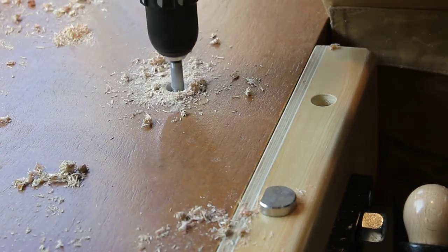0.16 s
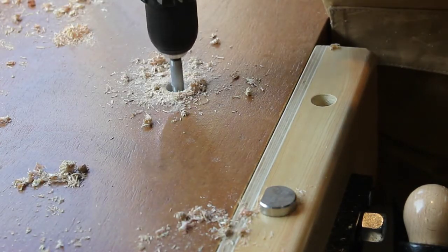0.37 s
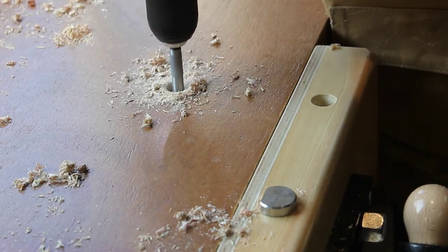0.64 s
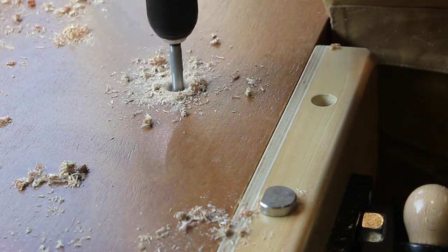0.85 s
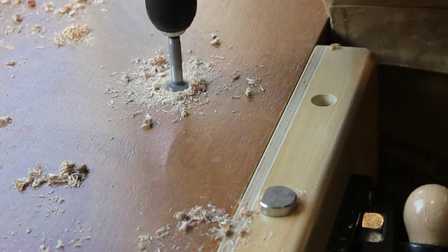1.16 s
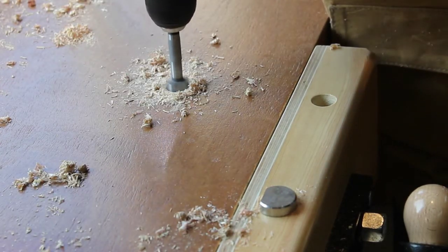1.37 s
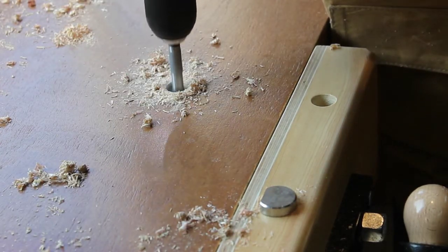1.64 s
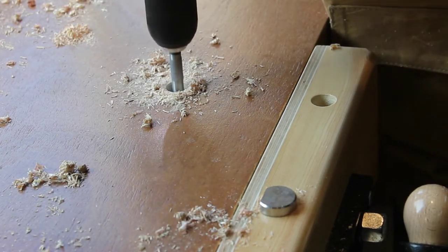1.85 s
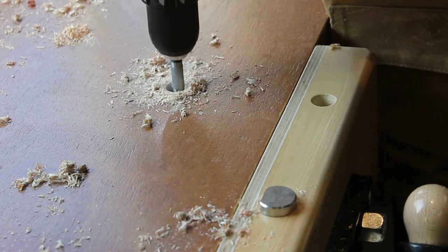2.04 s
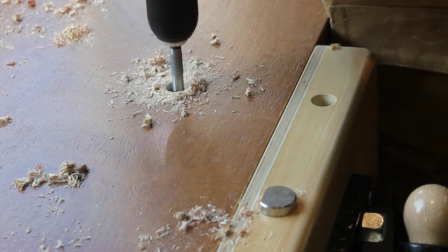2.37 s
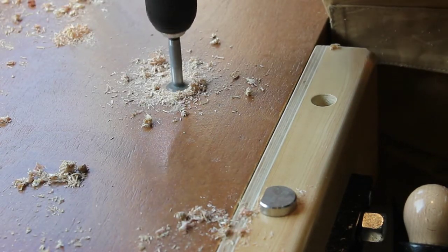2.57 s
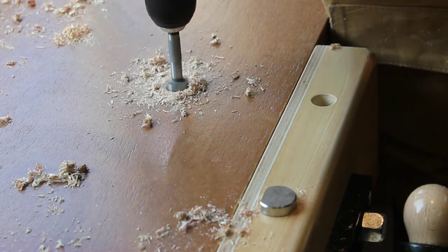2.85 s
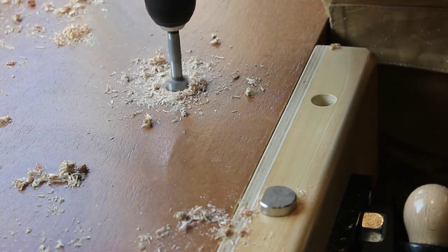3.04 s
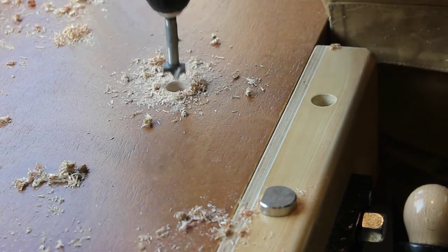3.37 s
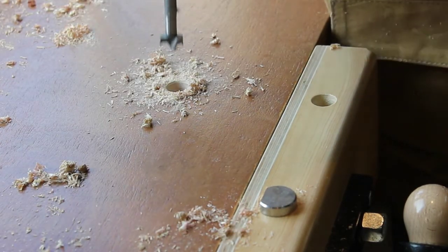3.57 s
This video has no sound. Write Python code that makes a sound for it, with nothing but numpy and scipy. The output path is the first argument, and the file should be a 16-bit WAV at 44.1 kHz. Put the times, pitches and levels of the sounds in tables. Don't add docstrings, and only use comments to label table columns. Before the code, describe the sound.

A cordless drill bores a wide hole in a wooden bench, its high gear whine wavering over gritty rattle and low thrumming bites, then runs down and clacks off; close mono microphone, small workshop.

```python
import sys
import numpy as np
from scipy import signal
from scipy.fft import rfft, irfft
from scipy.io import wavfile
from scipy.ndimage import uniform_filter1d

SR = 44100
rng = np.random.default_rng(int(sys.argv[2]) if len(sys.argv) > 2 else 0)


def unload_audio(sound):
    columns = np.transpose(np.atleast_2d(sound))
    steps = np.round(np.clip(columns, -1, 1) * 32767)
    wavfile.write(sys.argv[1], SR, steps.astype(np.int16))


def ratio(d):
    e = np.asarray(d, float) / 20
    return 10 ** e


N = 163170
T = np.arange(N) / SR

TEETH = 15
RELEASE_S, STOP_S, STOP_FADE_S = 2.968, 3.272, .004

# f/Hz, level/dB per Hz
AIR_COLOUR = [(15, -45.5), (25, 8), (59, 0.5), (86, -1), (227, -3.5), (496, -0.5), (703, -13.5),
              (805, -7.5), (15500, -26)]
# f/Hz, t60/s
ROOM_DECAY = [(100, 0.29), (500, 0.44), (2000, 0.34), (4500, 0.28), (6200, 0.27), (10000, 0.31)]
# f/Hz, level/dB
ROOM_COLOUR = [(100, 0), (1500, -2.5), (2200, -5.5), (3300, -3), (4400, 1.5), (5600, -0.5), (8000, -2.5),
               (15000, -3)]
# f/Hz, width/Hz, level/dB
BENCH_TOP = [(262, 17, -5), (354, 79, -3), (400, 35, -5), (499, 130, -0.5), (561, 32, -0.5), (616, 62, 1.5)]
# f/Hz, width/Hz, level/dB
BENCH_FRAME = [(84, 26, -1), (138, 30, 1)]
# start/s, length/s, growl/dB, thrum/dB, pitch f/Hz
BITES = [(0, 0.077, -76, -90, 477), (0.17, 0.12, -69.5, -78, 440), (0.549, 0.075, -70.5, -86, 565),
         (0.713, 0.1, -72, -85, 620), (0.851, 0.15, -72.5, -84.5, 494), (1.064, 0.58, -73.5, -95, 404),
         (1.648, 0.082, -69, -85, 513), (1.823, 0.052, -69, -82, 557), (2.01, 0.11, -74, -85, 444),
         (2.253, 0.31, -75, -83.5, 577), (2.603, 0.18, -72, -92, 386), (2.824, 0.13, -72.5, -89, 400),
         (3.058, 0.1, -72, -90, 317)]
# t/s, peak level/dB, dull share/0-1, snap level/dB
CLACKS = [(0.7738, -35.5, 0, -56), (2.288, -33, 0, -57), (3.2547, -47, 0.5, -56), (3.2692, -41.5, 0.2, -64),
          (3.2707, -40.5, 0.1, -60), (3.2738, -27, 0.06, -50), (3.296, -34, 0.26, -73),
          (3.32, -41.5, 0.3, -70.5), (3.326, -45, 0.15, -77.5), (3.339, -51, 0, -85),
          (3.345, -50.5, 0.26, -89), (3.364, -64, .8, -95), (3.377, -57, 0.05, -78.5)]
# f/Hz, level/dB, t60/s
LOCK_BRIGHT = [(3600, -14, .004), (4230, -9, .016), (4450, -12, .014), (4750, -9, .012), (5250, -2, .0045),
               (5800, -1, .0045), (6350, -4, .006), (7700, -13, .005), (70, -40, .025)]
# f/Hz, level/dB, t60/s
LOCK_DULL = [(780, -7, .025), (1300, -5, .018), (1640, 2, .018), (2114, 3, .016), (2600, -2, .016),
             (3050, -4, .012), (520, -11, .03)]
# f/Hz, width/Hz, level/dB
HOUSING_RINGS = [(5464, 10, -76), (1066, 30, -75), (4390, 30, -79)]
# f/Hz, width/Hz, lift/dB
HOUSING = [(1068, 41, 4.5), (1125, 283, 5), (1398, 43, 5), (1781, 262, -9), (2108, 343, 10),
           (2500, 320, 5.5), (3800, 550, 3), (4440, 250, 2.5), (5040, 340, 4), (5480, 91, 5),
           (6290, 1600, 3), (10270, 190, 6), (11480, 2700, -3), (13100, 970, 4.5)]
# t/s, level/dB
RATTLE_LEVEL = [(0.0, -56), (0.31, -55.5), (0.87, -55.5), (0.97, -56.5), (2.38, -55), (2.83, -56.5),
                (2.86, -55), (3.25, -59.5)]
# f/Hz, level/dB per Hz
RATTLE_COLOUR = [(88, -32), (150, -27.5), (607, -8.5), (695, -10.5), (1070, -4.5), (1800, 2), (2100, -7.5),
                 (3840, -1), (15500, -22.5)]
# t/s, f/Hz
MESH_PITCH = [(0, 3790), (.18, 3880), (.33, 3870), (.52, 3940), (.64, 3800), (.87, 3399), (.94, 3415),
              (1.05, 3625), (1.33, 3870), (1.55, 3980), (1.67, 3960), (1.9, 3803), (2.02, 3870),
              (2.25, 3905), (2.41, 3575), (2.52, 3465), (2.71, 3764), (2.93, 3890)]
# t/s, level/dB
WHINE_LEVEL = [(0, -63), (.1, -55.5), (.3, -61.5), (.5, -54), (.64, -56.5), (.74, -62.5), (.9, -57.5),
               (1.0, -62), (1.22, -63.5), (1.33, -49), (1.43, -48.5), (1.6, -51.5), (2.2, -57.5),
               (2.64, -63), (2.91, -51), (3.03, -62), (3.14, -55.5), (3.22, -63.5)]
# multiple/1, level/dB under the whine
SHAFT_ORDERS = [(1, -23), (2, -39), (4, -18.5), (5, -15), (10, -19.5), (11, -20.5), (13, -27.5), (14, -19),
                (16, -28), (20, -26.5), (22, -26.5), (25, -10.5), (35, -19.5)]


def evened(x):
    return x / np.sqrt(np.mean(x ** 2) + 1e-20)


def noise():
    return rng.standard_normal(N)


def curve(points):
    return np.interp(T, *np.transpose(points))


def read(points, hz):
    f, value = np.transpose(points)
    return np.interp(np.log(hz + 1), np.log(f + 1), value)


def drift(low_hz, top_hz):
    f = np.geomspace(low_hz, top_hz, num=24)[:, None]
    t = T[::64]
    waves = np.sin(2 * np.pi * (f * t + rng.random((24, 1)))) / np.sqrt(f)
    return np.interp(T, t, evened(waves.sum(0)))


def coloured(x, gain):
    return evened(irfft(rfft(x) * gain(np.fft.rfftfreq(N, 1 / SR)), N))


def resonance(hz, f, width):
    return 1 / (1 + (2 * (hz - f) / width) ** 2)


def housing_db(hz):
    return sum(lift * resonance(hz, f, width) for f, width, lift in HOUSING)


def running():
    coast_db, coast_s = -10, .065
    after = np.maximum(T - STOP_S, 0)
    shut = np.exp(-after / STOP_FADE_S)
    return shut + (1 - shut) * ratio(coast_db) * np.exp(-(after / coast_s) ** 4)


def floor():
    return ratio(-89) * coloured(noise(), lambda hz: ratio(read(AIR_COLOUR, hz)))


def room(x):
    taps = np.zeros(SR // 2)
    at = np.arange(140, SR // 2 - 20, 20)
    taps[at + rng.integers(0, 20, at.shape)] = rng.choice([-1., 1.], at.shape)
    hz, t, z = signal.stft(taps, SR, nperseg=256)
    decay_db = -60 * t / read(ROOM_DECAY, hz)[:, None]
    z = z * ratio(read(ROOM_COLOUR, hz)[:, None] + decay_db)
    tail = signal.istft(z, SR, nperseg=256)[1]
    return signal.fftconvolve(x, tail / np.linalg.norm(tail))[:N]


def bench():
    chatter_db, spot_db_per_oct = 2, 12
    out = np.zeros(N)
    start, length, growl_db, thrum_db, spot_hz = np.transpose(BITES)[:, :, None]
    attack = (T - start) / 0.012 + (start == 0)
    release = (start + length - T) / 0.084 + 1
    push = np.clip(np.minimum(attack, release), 0, 1)
    for k, (f, width, db) in enumerate(BENCH_TOP + BENCH_FRAME):
        if k < len(BENCH_TOP):
            level = growl_db - spot_db_per_oct * abs(np.log2(f / spot_hz))
        else:
            level = thrum_db - 2.5
        chatter = noise() * ratio(chatter_db * drift(6, 40))
        ring = coloured(chatter, lambda hz: resonance(hz, f, width))
        out += (ratio(level + db) * push).sum(0) * ring
    return out


def struck(modes, t):
    out = np.zeros(len(t))
    for k, (f, db, t60) in enumerate(modes):
        detune = rng.uniform(0.988, 1.012)
        out += (-1) ** k * ratio(db - 60 * t / t60) * np.sin(2 * np.pi * f * detune * t)
    return out


def clacks():
    snap_s, snap_hz = 0.0008, 10960
    t, out = T[:3000], np.zeros(N)
    for s, db, dull, snap_db in CLACKS:
        body = (1 - dull) * struck(LOCK_BRIGHT, t) + dull * struck(LOCK_DULL, t)
        grain = 3 * uniform_filter1d(rng.standard_normal(len(t)), size=4)
        snap = ratio(snap_db) * grain * np.cos(2 * np.pi * snap_hz * t) * np.exp(-t / snap_s)
        out[round(s * SR):][:3000] += np.minimum(t / 0.00015, 1) * (ratio(db - 3.5) * body + snap)
    return out


def housing_rings():
    out = np.zeros(N)
    for f, width, db in HOUSING_RINGS:
        ring = coloured(noise(), lambda hz: resonance(hz, f, width))
        out += ratio(db + 2 * drift(0.75, 8.9)) * ring
    return running() * out


def patchy(x):
    z = signal.stft(x, nperseg=512, noverlap=384)[2]
    field = rng.standard_normal(z.shape[::-1]).T
    field = uniform_filter1d(uniform_filter1d(field, size=4, axis=0), size=60, axis=1)
    return signal.istft(z * ratio(0.55 * evened(field)), nperseg=512, noverlap=384)[1][:N]


def rattle():
    grit_per_s, grit_spread_db, grit_share = 2500, 4.5, 0.12
    fizz_hz, flicker_db = 10500, 1.5
    size, chance, hiss = rng.exponential(1, N), rng.random(N), noise()
    knocks = chance < grit_per_s / SR * ratio(5 * drift(3, 40))
    grit = np.sign(hiss) * ratio(grit_spread_db * np.minimum(size, 5)) * knocks
    brush = np.roll(hiss, 99) * ratio(0.3 * drift(5.2, 60))
    source = np.sqrt(1 - grit_share) * brush + np.sqrt(grit_share) * evened(grit)
    body = patchy(coloured(source, lambda hz: ratio(read(RATTLE_COLOUR, hz) + housing_db(hz))))
    hz = np.fft.rfftfreq(N, 1 / SR)
    fizz = irfft(rfft(body) / (1 + (fizz_hz / (hz + 1)) ** 6), N)
    flicker = ratio(flicker_db * drift(6, 150) - 3 * (T > STOP_S))
    return ratio(curve(RATTLE_LEVEL) + 5) * running() * (body + (flicker - 1) * fizz)


def motor():
    run_down_hz_per_s, lowest_hz, inertia_s = 3620, 2880, .03
    free_hz, slip_hz, slip_per_sag = 3900, 6, .035
    mesh = curve(MESH_PITCH) - run_down_hz_per_s * np.maximum(T - RELEASE_S, 0)
    mesh = uniform_filter1d(np.maximum(mesh, lowest_hz), round(inertia_s * SR), mode="nearest")
    sag = np.maximum(free_hz - mesh, 0) * (T < RELEASE_S)
    return mesh + (slip_hz + slip_per_sag * sag) * drift(7, 60), sag


def rub():
    return coloured(noise(), lambda hz: 1 / (1 + (hz / 160) ** 4))


def whine():
    mesh, sag = motor()
    turns = 2 * np.pi * np.cumsum(mesh) / SR
    loud = curve(WHINE_LEVEL)
    breaking_db = .004 * sag * (drift(4, 30) - 0.4)
    out = ratio(loud + 1.3 * drift(9.5, 150) + breaking_db) * np.sin(turns)

    fray = (rub() * np.sin(turns) + rub() * np.cos(turns)) / np.sqrt(2)
    out += ratio(loud - 12 + .01 * sag) * fray

    for side in (-1, 1):
        out += ratio(loud - 23.5 + 5.9 * drift(1.435, 12)) * np.sin((1 + side * .45 / TEETH) * turns)

    octave_ring_hz, octave_width_hz, octave_lift_db = 7660, 250, 8.5
    ring_db = octave_lift_db / (1 + (2 * (2 * mesh - octave_ring_hz) / octave_width_hz) ** 4)
    out += ratio(-78 + ring_db + 2 * drift(4, 48)) * np.sin(2 * turns)

    freed_db = -6 * np.clip((T - RELEASE_S) / 0.063, 0, 1)
    for k, db in SHAFT_ORDERS:
        ring_db = 2 * housing_db(k / TEETH * mesh)
        level = -68 + 0.17 * (loud + 56.5) + db + freed_db + ring_db + 2 * drift(2, 40)
        out += ratio(level) * np.sin(k / TEETH * turns + 6 * rng.random())

    coast = 10 / TEETH
    freed = (T > RELEASE_S) * ratio(-64 + 4 * drift(11, 80)) * resonance(coast * mesh, 2070, 300)
    out += freed * np.sin(coast * turns)
    out += ratio(-77 + 2.1 * drift(1.1, 30)) * np.sin(.275 * turns)
    return np.sqrt(2) * out * np.clip((STOP_S - T) / STOP_FADE_S, 0, 1)


def scene():
    near = rattle() + housing_rings() + bench() + clacks()
    tone = whine()
    mono = near + tone + ratio(-11.5) * room(near + .5 * tone) + floor()
    return np.array([mono, mono])


def band_limit(x):
    return signal.sosfilt(signal.butter(12, 15680, fs=SR, output="sos"), x)


def record(dry):
    low_hz, top_hz = 42, 15680
    hz = np.fft.rfftfreq(N, 1 / SR)
    gain = hz ** 2 / (hz ** 2 + low_hz ** 2) / (1 + (hz / top_hz) ** 300)
    return band_limit(irfft(rfft(dry) * gain, N))


dry = scene()
out = record(dry)
unload_audio(out)
```